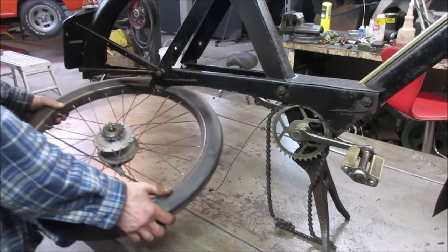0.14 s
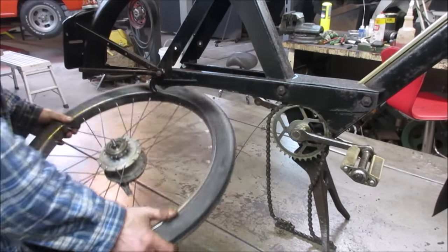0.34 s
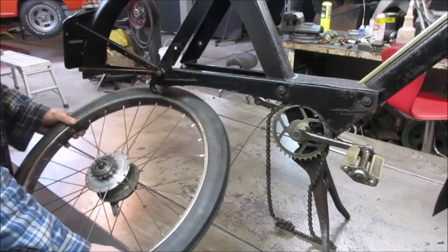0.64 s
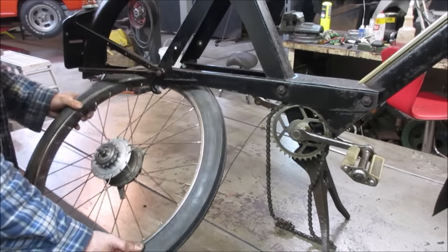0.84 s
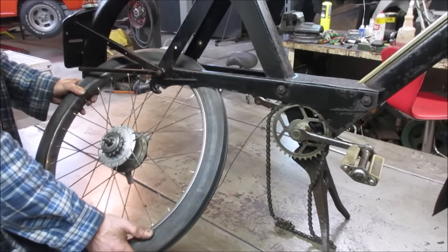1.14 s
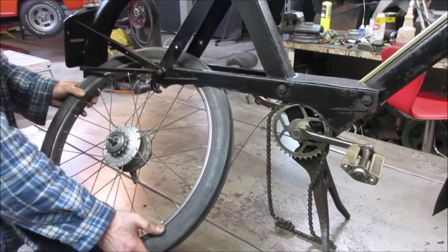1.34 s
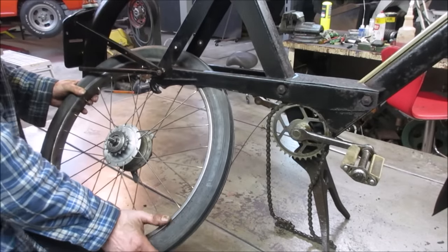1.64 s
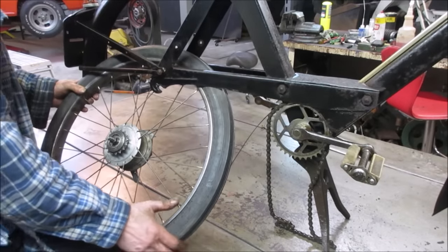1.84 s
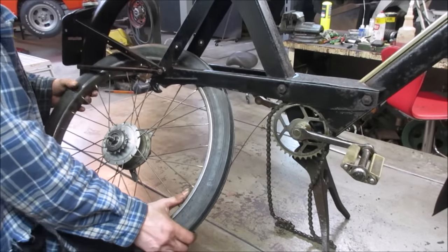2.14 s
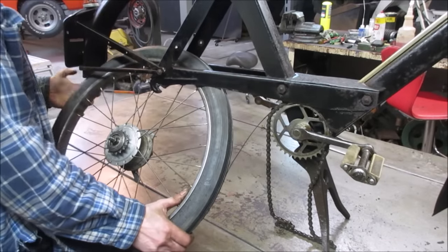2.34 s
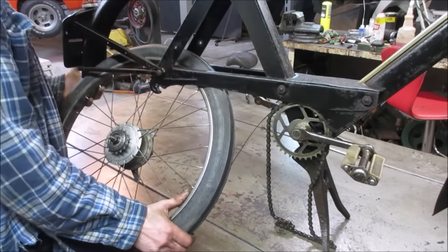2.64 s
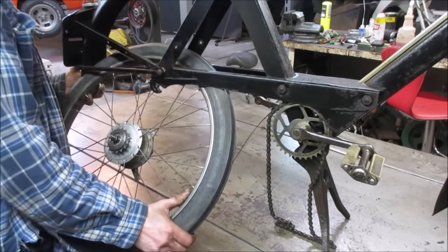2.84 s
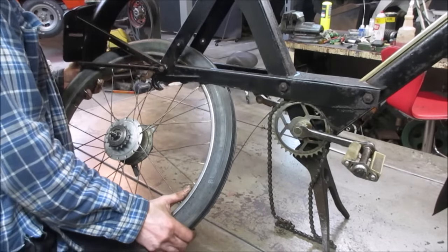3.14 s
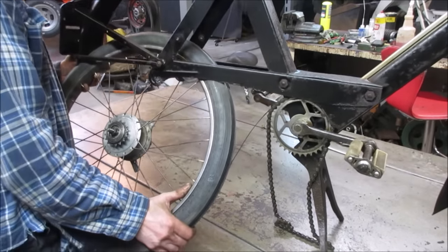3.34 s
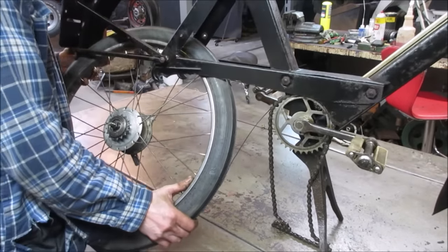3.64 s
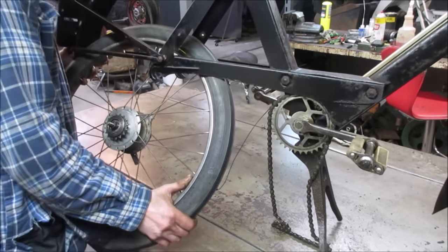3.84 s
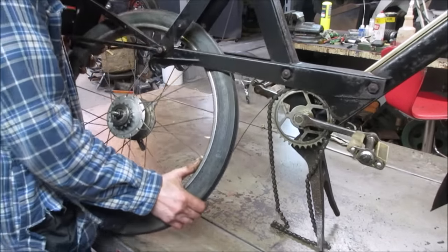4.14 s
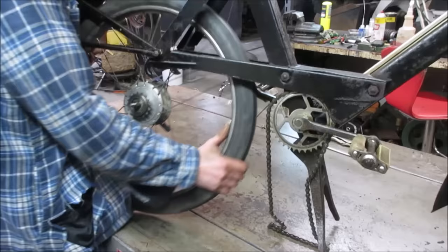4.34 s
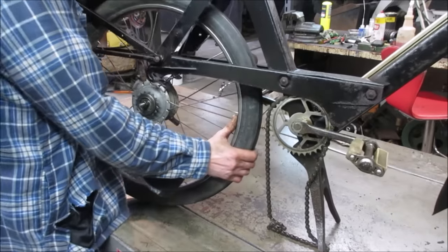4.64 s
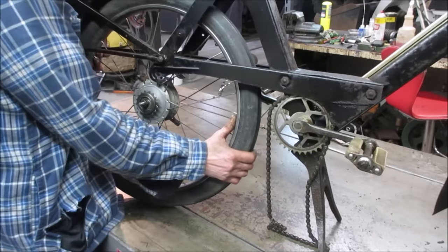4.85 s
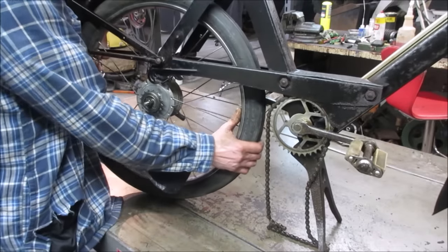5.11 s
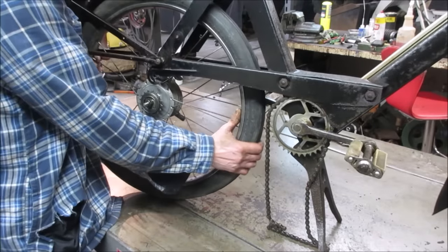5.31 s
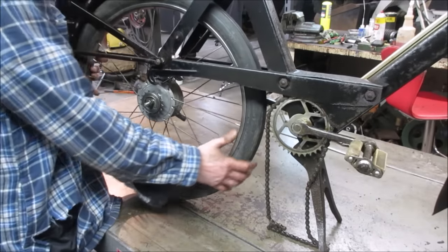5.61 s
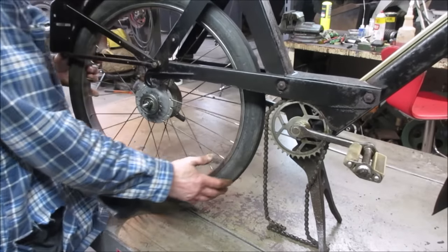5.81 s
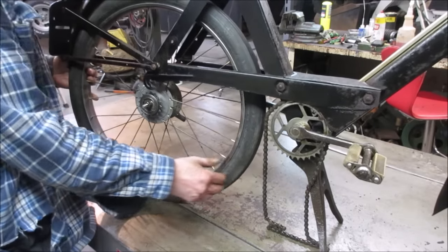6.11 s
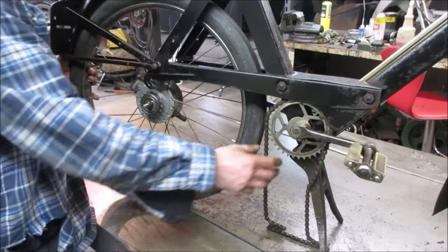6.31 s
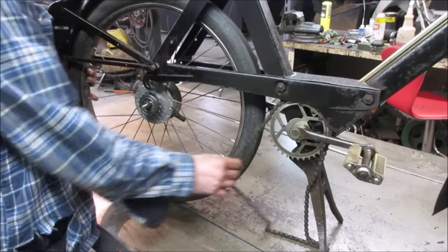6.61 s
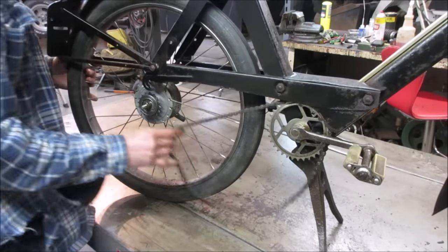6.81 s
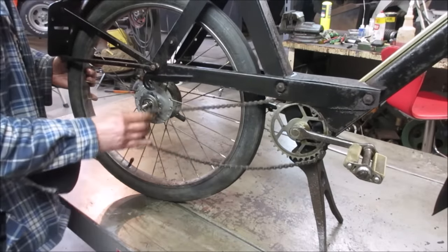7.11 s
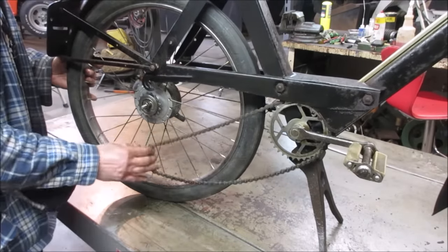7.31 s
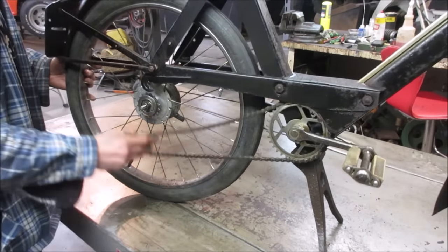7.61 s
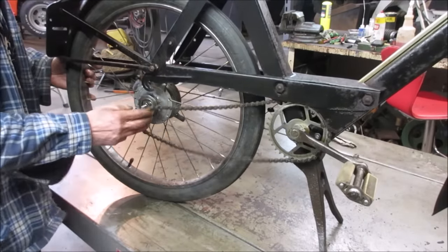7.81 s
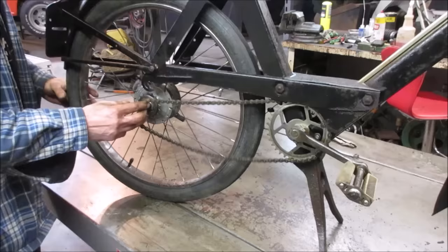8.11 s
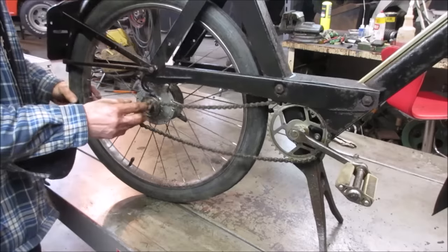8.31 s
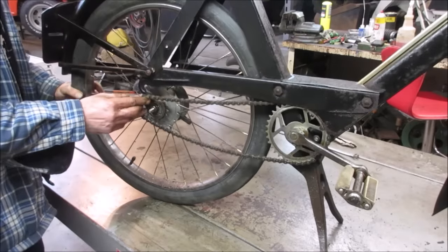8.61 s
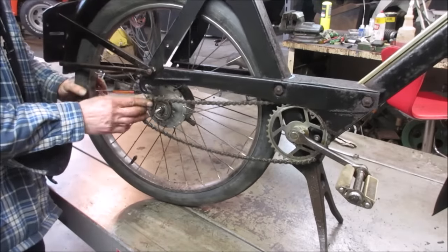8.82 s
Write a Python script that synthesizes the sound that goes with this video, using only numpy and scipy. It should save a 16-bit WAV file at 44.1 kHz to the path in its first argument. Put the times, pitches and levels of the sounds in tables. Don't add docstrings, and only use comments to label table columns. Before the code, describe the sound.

Close metal knocks and rubber rubs, one hard sharp crack, then more clunks and a rattling chain in an echoing concrete workshop.

```python
import sys
import numpy as np
from scipy import signal
from scipy.fft import rfft, irfft, next_fast_len
from scipy.io import wavfile
from scipy.ndimage import uniform_filter1d, map_coordinates

SR = 44100
rng = np.random.default_rng(int(sys.argv[2]) if len(sys.argv) > 2 else 0)


def store_wav(level_fs):
    pcm = np.round(np.clip(np.atleast_2d(level_fs), -1, 1) * 32767)
    wavfile.write(sys.argv[1], SR, pcm.T.astype(np.int16))


def invert_db(x):
    u = np.asarray(x, float) / 20
    return 10 ** u


N = 395136

# (time [s], pressure [dB], brightness [dB])
RUB_STROKES = [(0.0, -62.5, -8), (1.6, -67.5, 22.5), (2.05, -42, 12.5), (3.1, -95, -44), (3.32, -43, 14),
               (3.69, -51, 8), (3.89, -46.5, 7), (4.2, -64.5, -1), (4.54, -49, 0), (4.79, -77, -20),
               (5.07, -50.5, 13), (5.4, -72.5, 10), (5.79, -51.5, 22), (6.01, -62, -6.5), (6.6, -67, -8),
               (6.85, -27, 7.5), (6.96, -49, 5), (8.96, -56, 8.5)]
# (frequency [Hz], level [dB], t60 [s])
HUB_MODES = [(2420, -1.5, 0.14), (2870, -13, 0.18), (3380, 1.5, .13), (4045, -27, 0.1188),
             (4610, -14.5, 0.25), (5430, -13.5, 0.091)]
# (start [s], push length [s], hum level [dB], upper mode level [dB])
JOLTS = [(0.72, 0.08, -58, -53), (1.765, 0.085, -54, -51.5), (1.873, 0.074, -51.5, -56),
         (2.233, 0.052, -46.5, -49), (2.376, 0.15, -58, -58), (2.53, 0.12, -53.5, -52.5),
         (2.816, 0.11, -54, -53.5), (2.942, 0.033, -55, -68), (3.1, 0.16, -51.5, -53),
         (3.33, 0.09, -40.5, -42), (3.405, 0.1, -52, -37.5), (3.53, 0.076, -35.5, -44),
         (4.338, 0.12, -83, -62.5), (4.455, 0.05, -69, -53), (4.965, 0.091, -60.5, -56),
         (5.144, 0.18, -59.5, -55.5), (5.723, 0.12, -54.5, -54), (5.837, 0.22, -59.5, -60),
         (6.142, 0.066, -28.5, -39), (6.397, 0.036, -50.5, -57), (6.652, 0.074, -51, -50.5),
         (6.768, 0.047, -57, -43), (6.903, 0.14, -56, -50), (6.994, 0.1, -50.5, -51),
         (7.161, 0.21, -60, -59.5), (7.395, 0.17, -56, -46), (7.53, 0.22, -67, -57.5),
         (8.373, 0.062, -50.5, -55.5), (8.536, .17, -65, -56), (8.853, 0.11, -52, -50)]
SNAP_AIR_S = 3.7292


def unit(x):
    return x / np.sqrt(np.mean(x ** 2) + 1e-20)


def along(points, hz):
    f, v = np.transpose(points)
    return np.interp(np.log(hz + 1), np.log(f + 1), v)


def curves(rows):
    s, *cols = np.transpose(rows)
    return [np.interp(np.arange(N) / SR, s, c) for c in cols]


def filtered(x, response):
    m = next_fast_len(N + SR // 2)
    return irfft(rfft(x, m) * response(np.fft.rfftfreq(m, 1 / SR)), m)[..., :N]


def band(x, lo_hz, hi_hz):
    sos = signal.butter(2, [lo_hz, min(hi_hz, SR / 2.1)], "band", fs=SR, output="sos")
    return signal.sosfilt(sos, x)


def resonances(modes):
    def response(f):
        total = 0
        for k, (center, width, db) in enumerate(modes):
            peak = 1j * f * width / (center * center - f * f + 1j * f * width)
            total = total + (-1) ** k * invert_db(db) * peak
        return total
    return response


def ring(modes, t, damping, spread=0.0045):
    hz, db, t60 = np.transpose(modes)[:, :, None]
    luck = rng.standard_normal((4, len(modes), 1))
    swing = np.sin(2 * np.pi * hz * (1 + spread * luck[1]) * t + luck[2])
    stray = 0.6 * np.sin(2 * np.pi * hz * (1 + 0.08 * luck[3]) * t)
    fade = invert_db(db + 2.5 * luck[0] - 60 * t / (t60 * damping))
    return np.sum(fade * (swing + stray), axis=0)


def contacts(rows, build, middle, ring_db, damping, crack):
    # (frequency [Hz], level [dB], t60 [s])
    tubes = [(858, -4, 0.38), (1018, 0.5, 0.31), (1192, 2, 0.28), (1500, -2, 0.19), (1857, -7, 0.27)]
    # (frequency [Hz], level [dB], t60 [s])
    pins = [(6440, 3, 0.1034), (7860, 14, 0.084), (8360, 0, 0.1), (9360, 6, 0.11), (9200, -3, 0.15),
            (11700, -21.5, 0.01)]
    noisy, rung = np.zeros((3, N + SR)), np.zeros(N + SR)
    t = np.arange(SR // 5) / SR
    for s, db, tube_db, pin_db, grind_s in rows:
        rise_s = build[0] * invert_db(build[1] * tube_db)
        onset = invert_db(db - 1.0) * (1 - np.exp(-t / max(rise_s, 1e-4))) ** 2
        grit = invert_db(3.5 * unit(uniform_filter1d(rng.standard_normal(len(t)), size=60)) - 1)
        grind = 0.5 * grit * invert_db(-60 * t / max(grind_s, 0.004))
        force = 1.4 * crack * invert_db(-60 * t / 0.0078) + grind
        levels = invert_db(np.array([[tube_db], [0], [pin_db]]))
        at = round(s * SR)
        noisy[:, at:at + len(t)] += levels * onset * force * rng.standard_normal((3, len(t)))
        rings = [ring(part, t, damping) for part in (tubes, middle, pins)]
        rung[at:at + len(t)] += invert_db(ring_db) * onset * np.sum(levels * rings, axis=0)
    low = band(noisy[0], 610, 2300)
    mid = band(noisy[1], 1800, 5360)
    high = band(band(noisy[2], 5500, 12500), 4500, 15500)
    return (3 * low + 1.65 * mid + 1.056 * high + rung)[:N]


def room_tone():
    # (frequency [Hz], density [dB per Hz])
    tone = [(12, -40.5), (20, -10.5), (47, -2), (144, -3.5), (298, -10), (686, -11.5), (1160, -10.5),
            (1450, -8.5), (1820, -19), (2760, -20), (3000, -20), (4680, -24), (9660, -25), (14300, -33.5),
            (15500, -37.5)]
    room_db, duck_s, duck_db, hold_s = -63, 3.7, 23, 0.4
    quick_db, quick_s, creep_db_per_s = 13.5, 0.21, 2.5
    air = filtered(rng.standard_normal(N), lambda hz: invert_db(along(tone, hz)))
    since = np.arange(N) / SR - duck_s
    back = np.maximum(since - hold_s, 0)
    ducked_db = duck_db * np.clip(since / 0.055 + 1, 0, 1)
    recovered_db = quick_db * np.minimum(back / quick_s, 1) + creep_db_per_s * back
    return invert_db(room_db - ducked_db + recovered_db) * air / np.std(band(air, 38, 78.2))


def rub():
    # (frequency [Hz], density [dB per Hz])
    rubber = [(150, -44.5), (250, -6), (1160, 2.5), (1310, -0.5), (2060, -4.5), (2200, -4), (3110, -3.5),
              (11600, -23), (15500, -35)]
    db, bright_db = curves(RUB_STROKES)
    strokes = map_coordinates(rng.standard_normal(300), [np.linspace(0, 298, N)])
    slips = invert_db(2.2 * unit(uniform_filter1d(rng.standard_normal(N), size=90)) + 1.6 * strokes)
    drag = filtered(slips * rng.standard_normal(N), lambda hz: invert_db(along(rubber, hz)))
    drag = drag / np.std(band(drag, 2000, 6000))
    dull = filtered(drag, lambda hz: 1 / (1 + (hz / 1900) ** 4))
    bright = filtered(drag, lambda hz: 1 - 1 / (1 + (hz / 6000) ** 4))
    middle = drag - dull - bright
    return invert_db(db - 7.5) * (invert_db(-1) * dull + middle + invert_db(bright_db) * bright)


def jingle(count=1500):
    db, t = curves(RUB_STROKES)[0], np.arange(256) / SR
    at, pitch, size = rng.random((count, 3)).T[:, :, None]
    start = (at * N).astype(int)
    fade = invert_db(db[start] + 17 * size ** 2 - 10 - 60 * t / 0.012)
    tick = fade * np.sin(2 * np.pi * 1800 * 4 ** pitch * t)
    return np.bincount((start + np.arange(len(t))).ravel(), tick.ravel(), N + len(t))[:N]


def tyre_scuffs():
    # (time [s], strength [dB], tube ring [dB], contact noise t60 [s])
    scuffs = [(0.014, -39, 13, 0.11), (1.25, -29, -14, 0.09), (1.3144, -29.5, 2, 0.11),
              (1.4794, -50, -9, .13), (1.6894, -54, -5, .15), (1.7426, -51.5, 12, 0.28),
              (2.0124, -19, -6.5, .21), (2.3835, -34, 2.5, 0.21), (2.657, -38.5, -8, 0.57),
              (3.1571, -5, -7, 0.063), (3.3121, -31, 5.5, 0.63), (4.3092, -41.5, 6.5, 0.14),
              (4.3486, -36, -1.5, 0.13), (4.4625, -53, -8, 0.22), (4.752, -32.5, -6.5, 0.082),
              (4.9393, -41.5, 6.5, 0.25), (4.977, -20, -38, 0.1), (5.105, -37, -11, 0.61),
              (5.709, -11.5, -11.5, 0.076), (5.981, -42, -1, 0.21), (6.0731, -38.5, 3, 0.24),
              (6.1441, -20.5, 3, 0.08), (7.8253, -49, 7, 0.11), (7.9838, -25, -5, 0.15),
              (8.326, -28, -7, 0.2), (8.3907, -29.5, -8.5, 0.37), (8.4973, -18.5, -11, 0.13),
              (8.5591, -24.5, 0, 0.097), (8.7512, -21.5, -24, 0.15), (8.824, -32.5, -2.5, 0.39)]
    pin_db = -4
    rows = [(s, db, tube_db, pin_db, grind_s) for s, db, tube_db, grind_s in scuffs]
    return contacts(rows, (0.011, 0.0198), HUB_MODES, -22, damping=0.3, crack=0.01)


def pings():
    # (time [s], contact peak [dB], frequency [Hz], t60
    # [s])
    mode_pings = [(0.02, -35, 787, 0.089), (1.319, -46, 1210, 0.16), (2.39, -34, 1146, 0.13),
                  (2.551, -35.5, 5430, 0.056), (2.68, -42, 3870, 0.045), (2.846, -31, 5470, .1),
                  (2.846, -35, 6570, .06), (3.7295, -2, 5880, .022), (3.7315, -6, 7160, 0.033),
                  (3.78, -24, 4250, 0.059), (5.235, -37.5, 1720, 0.27), (3.731, -23, 745, 0.06),
                  (5.713, -36, 2580, .07), (5.73, -40, 3450, .2), (5.786, -36, 1145, .07),
                  (5.79, -39, 5380, 0.081), (5.797, -35.5, 1850, .07), (5.854, -35, 1070, 0.1),
                  (5.866, -36.5, 1486, 0.12), (6.679, -28, 7940, 0.053), (6.679, -24.5, 10150, .06),
                  (6.827, -18, 6700, .06), (6.89, -38, 10600, .04), (7.0715, -27, 11800, 0.037),
                  (7.099, -36, 3034, 0.26), (7.409, -36, 8900, .04), (7.476, -36, 4100, .05),
                  (7.518, -30, 7930, 0.045), (8.0351, -36.5, 3050, .15), (8.3766, -35.5, 1476, .12),
                  (8.4177, -36, 3400, 0.061), (8.534, -40, 2510, 0.22), (8.57, -32, 7000, .02),
                  (8.655, -37, 7960, .03), (8.791, -42, 4500, .04), (8.903, -20, 8700, .03),
                  (8.9225, -22, 8800, .03),
                  (0.66, -37, 1820.0, 0.14), (2.2346, -32.0, 1002, 0.14), (2.2365, -37, 1225, 0.1),
                   (2.2358, -24, 1625, 0.05), (2.2355, -31, 2540, 0.069), (2.2366, -23.5, 3350.0, 0.068),
                   (2.551, -31, 1215, 0.11), (2.5507, -25, 1595, 0.061), (2.5503, -21, 1850, 0.031),
                   (2.5503, -27, 2530, 0.054), (2.55, -33, 4680, 0.07), (2.8452, -31, 1226, 0.076),
                   (2.844, -27, 1560, 0.055), (2.8456, -25, 2510.0, 0.059), (2.8444, -24, 3200.0, 0.069),
                   (2.8456, -33, 4650, 0.07), (3.1025, -38, 1497, 0.18), (3.1033, -43, 1840, 0.142),
                   (3.337, -22, 1840.0, 0.089), (3.348, -29, 970, 0.1), (3.3483, -15.5, 1565, 0.084),
                   (3.3487, -19, 2750, 0.12), (3.3487, -10.5, 3390, 0.061), (3.349, -23, 4600, 0.11),
                   (3.3487, -22, 4940, 0.074), (3.44, -29, 240, 0.7), (3.4012, -29, 3470.0, 0.17),
                   (3.4019, -29, 5245, 0.184), (3.445, -33, 425, 0.15), (3.427, -34.5, 2660.0, 0.2),
                   (3.4271, -28.0, 3430, 0.14), (3.41, -30, 330, 0.3), (3.5483, -30, 2350.0, 0.08),
                   (4.5282, -23, 1795, 0.062), (4.529, -30, 2440, 0.057), (4.5282, -38.5, 2740, 0.125),
                   (4.528, -33.5, 3570.0, 0.055), (4.5264, -22, 4030, 0.078), (4.565, -32, 1280.0, 0.075),
                   (4.5644, -28, 1715, 0.059), (4.5665, -31.0, 2990, 0.06), (4.5655, -29, 4770, 0.067),
                   (5.2138, -35.5, 1498, 0.11), (5.265, -45, 760, 0.4), (5.212, -36.0, 3150, 0.1),
                   (5.2144, -36.5, 3320, 0.13), (5.723, -32, 1192, 0.1), (5.782, -39, 348, 0.4),
                   (5.722, -37.5, 2590.0, 0.16), (5.7235, -36, 3450.0, 0.21),
                  (6.2062, -29, 990.0, 0.095), (6.215, -38, 1420.0, 0.18), (6.2043, -30, 1850.0, 0.068),
                   (6.155, -28, 237, 0.35), (6.328, -42, 1460.0, 0.12), (6.4602, -40.5, 1460.0, 0.11),
                   (6.4611, -42, 1830.0, 0.06), (6.4611, -38.5, 2230.0, 0.052), (6.783, -33, 900.0, 0.3),
                   (6.783, -30, 3190.0, 0.24), (6.826, -24.0, 1630.0, 0.12), (6.826, -27, 1900.0, 0.184),
                   (6.827, -17, 3250.0, 0.053), (6.826, -19, 3610.0, 0.072), (6.846, -31, 1370.0, 0.14),
                   (6.846, -29.0, 1860.0, 0.082), (7.012, -32, 3790.0, 0.078), (7.013, -29, 4020.0, 0.083),
                   (7.013, -27, 5120.0, 0.078), (7.086, -38, 1900.0, 0.22), (7.0867, -36, 2370.0, 0.095),
                   (7.0995, -31, 1860.0, 0.13), (7.099, -37.0, 3030.0, 0.2), (7.4042, -36, 4080.0, 0.081),
                   (7.4186, -37, 2420.0, 0.092), (7.42, -39, 468, 0.6), (7.4177, -39, 3790.0, 0.128),
                   (7.4177, -28, 5050.0, 0.076), (7.5015, -34.0, 3400.0, 0.2),
                   (7.5015, -35.0, 8730.0, 0.096), (7.517, -27, 1810.0, 0.075),
                   (7.5178, -29.5, 3620.0, 0.08), (7.517, -37, 4040.0, 0.074),
                   (7.5166, -26.5, 5830.0, 0.064), (7.9333, -44, 3070.0, 0.1), (7.9336, -42, 3830.0, 0.049),
                   (8.605, -29.0, 2410.0, 0.066), (8.605, -25.5, 2630.0, 0.09), (8.615, -36, 1480.0, 0.24),
                   (8.6137, -28, 1850.0, 0.044), (8.6137, -29, 2170.0, 0.12), (8.6126, -23, 2760.0, 0.068),
                   (8.904, -35, 1780.0, 0.17), (8.904, -20, 2620.0, 0.064), (8.902, -23, 2990.0, 0.079),
                   (8.902, -25.0, 4100.0, 0.054), (8.902, -22, 4990.0, 0.13), (8.9221, -31, 960.0, 0.2),
                   (8.9221, -35, 1420.0, 0.191), (8.9221, -22, 4930.0, 0.061)]
    ping_db, tail_db = -1.5, -16
    damping, wander = 0.5, 0.085
    out, t = np.zeros(N + SR), np.arange(SR // 5) / SR
    for s, db, hz, t60 in mode_pings:
        drift = wander * min(hz / 1500, 1) * np.cumsum(rng.standard_normal(len(t)))
        early = invert_db(-60 * t / max(t60 * damping, 0.012))
        late = invert_db(tail_db - 60 * t / max(t60, 0.02))
        onset = 1 - np.exp(-t / max(0.0012, 2 / hz))
        tone = np.sin(2 * np.pi * hz * t + drift)
        out[round(s * SR):][:len(t)] += invert_db(db + ping_db) * (early + late) * tone * onset
    return out[:N]


def wheel_knocks():
    # (time [s], peak [dB], tube ring [dB], small-part ring [dB], contact noise t60 [s])
    knocks = [(0.1878, -31.5, -6, -13, 0.063), (0.6602, -55, -7, -25, 0.025), (2.2366, -18, 4, -46, 0.03),
              (2.5503, -28.5, 7.5, -42, 0.094), (2.8451, -18.5, 2.5, -34, 0.054),
              (3.0705, -34, -8, 2.5, 0.08), (3.1035, -40, 17, -30, 0.064), (3.1235, -35, 11.5, -27, 0.022),
              (3.3383, -20.5, 1, -7, 0.11), (3.3487, -7, -10, -13, 0.064),
              (3.4012, -14.5, -10, -4.5, 0.045), (3.4276, -15, -5.5, -29, 0.026),
              (3.486, -27, -3, -13, 0.1), (3.5475, -34, 3, -19, 0.16), (3.6807, -29, -14, -1, 0.083),
              (3.697, -25, -9, -7, 0.1), (4.0303, -40, -23.5, -23, 0.1), (4.5284, -11, -14.5, -11.5, 0.039),
              (4.5655, -16.5, -7.5, -19, 0.026), (5.2134, -19, -13.5, -17.5, 0.096),
              (5.854, -40.5, 15, 7, 0.045), (6.2058, -40.5, 18, -1.5, 0.022),
              (6.3282, -46, 16.5, -33, 0.044), (6.4611, -41, 12, -34.5, 0.098)]
    return contacts(knocks, (0.0014, 0.032), HUB_MODES, -15, damping=0.24, crack=1.2)


def further_knocks():
    # (time [s], peak [dB], tube ring [dB], small-part ring [dB], contact noise t60 [s])
    taps = [
        (0.661, -40, 8.5, -25, .06),
        (4.9815, -45, -9, -15, .05),
        (5.716, -36, -5.5, -9.5, 0.048),
        (5.7228, -30.5, 1.5, -12, 0.16),
        (5.789, -37, 11.5, -12, 0.063),
        (5.878, -45.5, 12.5, -17, 0.042),
    ]
    return contacts(taps, (0.0014, 0.032), HUB_MODES, -17, damping=0.24, crack=1.2)


def pushes(level_db, t60):
    start, lasts = np.transpose(JOLTS)[:2, :, None]
    grid = np.arange(0, N + 64, 64)
    t = grid / SR - start
    build = 1 - np.exp(-np.maximum(t, 0) / 0.0075)
    each = invert_db(level_db[:, None] - 60 * np.maximum(t - lasts, 0) / t60) * build
    return np.interp(np.arange(N), grid, np.sqrt(np.sum(each ** 2, axis=0)))


def frame_hum():
    # (frequency [Hz], width [Hz], level [dB])
    stand_modes = [(109.8, 13, 0)]
    # (frequency [Hz], width [Hz], level [dB])
    wheel_modes = [(232, 48, 1), (349, 28, 2.5), (441, 90, -5)]
    hum_t60_s, upper_t60_s = 0.4, 0.33
    hum_db, upper_db = np.transpose(JOLTS)[2:]
    push = rng.standard_normal((2, N))
    stand = unit(filtered(push[0], lambda f: resonances(stand_modes)(f) ** 2))
    steady = stand / (np.abs(signal.hilbert(stand)) + 0.29)
    upper = unit(filtered(push[1], resonances(wheel_modes)))
    return pushes(hum_db, hum_t60_s) * unit(steady) + pushes(upper_db, upper_t60_s) * upper


def axle_snap():
    # (time [s], peak [dB], tube ring [dB], small-part ring [dB], contact noise t60 [s])
    snaps = [
        (3.7288, 4, -27, -2, 0.016),
        (3.734, -9, -18.5, -3.5, 0.071),
    ]
    # (frequency [Hz], level [dB], t60 [s])
    axle = [(1642, -25.5, .03), (2970, -16.5, .05), (3450, 1.5, 0.049), (4120, -15, 0.014), (5060, -9, .03),
            (5350, 25.5, 0.023)]
    return band(contacts(snaps, (0.0055, 0.72), axle, -17, damping=0.2, crack=1.6), 2400, 16000)


def pop():
    pop_db, lasts_s = -7.5, 0.00053
    u = np.maximum(np.arange(N) / SR - SNAP_AIR_S, 0) / lasts_s
    return invert_db(pop_db) * u * (2 - u) * np.exp(-np.minimum(u, 60))


def snap_click():
    return invert_db(24) * band(signal.unit_impulse(N, round(SNAP_AIR_S * SR)), 1800, 9500)


def chain_links():
    # (time [s], peak [dB], tube ring [dB], small-part ring [dB])
    links = [(6.6572, -30, -5.5, -11), (6.678, -32.5, -17, 5), (6.75, -50, -10, -4), (6.783, -21, -4, -8),
             (6.826, -10.5, -8, -9.5), (6.8907, -38, -18, -12), (7.013, -20.5, -27, 1),
             (7.0713, -29, -24, 1), (7.0872, -24.5, -7, -10), (7.0996, -25.5, -8, -3.5),
             (7.192, -37.5, -29, -7), (7.332, -35.5, -17, -15), (7.4045, -28, -9, -5),
             (7.4175, -14, -12.5, -20), (7.474, -39, -23, -1), (7.502, -22, -20, -7),
             (7.5175, -11, -14, -18), (7.583, -46, -12, 7), (7.6144, -58, -25, -20),
             (7.71, -35.5, -33, -3.5), (7.9335, -27.5, -50, -12), (8.035, -39, -16, -30),
             (8.086, -33.5, 0, -6), (8.146, -38, -25, -10), (8.3756, -31.5, 3, -2), (8.4197, -32, -14, -5),
             (8.604, -23.5, -5, -30), (8.6132, -14, -1.5, -40), (8.903, -11.5, -6, -1), (8.922, -22, -6, 5)]
    # (frequency [Hz], level [dB], t60 [s])
    sprocket = [(2420, -26, 0.18), (3080, -1, 0.27), (4150, 12, 0.074), (4850, 10, 0.056),
                (6280, 14.5, 0.037)]
    grind_s = 0.052
    rows = [(*row, grind_s) for row in links]
    return contacts(rows, (0.0016, 0.48), sprocket, -16, damping=0.25, crack=1.2)


def shop(x, piece=SR // 4):
    # (frequency [Hz], t60 [s])
    decay = [(150, 0.53), (1000, 0.55), (3000, 0.37), (6000, 0.3), (14000, 0.21)]
    out = np.zeros(N + SR + piece)
    for start in range(0, N, piece):
        hz, t, z = signal.stft(rng.standard_normal(SR * 3 // 4), SR, nperseg=256)
        tail = signal.istft(z * invert_db(-60 * t / along(decay, hz)[:, None]), SR, nperseg=256)[1]
        wet = signal.fftconvolve(x[start:start + piece], tail / np.linalg.norm(tail))
        out[start + 250:][:len(wet)] += wet
    return out[:N]


def scene():
    metal = invert_db(-1) * (wheel_knocks() + chain_links())
    metal = metal + tyre_scuffs() + jingle() + further_knocks() + pings()
    air_push = pop()
    echo = invert_db(-7.5) * shop(metal + snap_click() + 0.6 * band(air_push, 200, 1100))
    near = metal + axle_snap() + band(air_push, 230, 4000) + rub()
    return (near + echo + frame_hum() + room_tone())[None]


def low_pass(x):
    return signal.sosfilt(signal.butter(12, 15700, fs=SR, output="sos"), x)


def record(dry):
    x = dry / (1 + np.abs(dry) ** 6) ** (1 / 6)
    x = filtered(x, lambda hz: 1 / (1 + (hz / 15300) ** 120))
    return low_pass(x)


dry = scene()
out = record(dry)
store_wav(out)
```